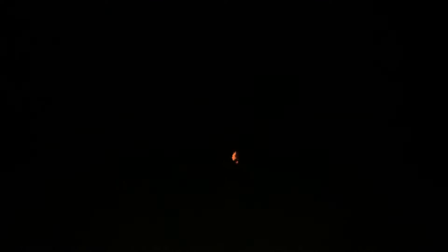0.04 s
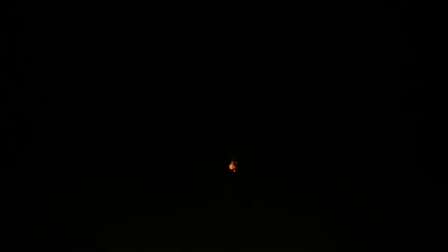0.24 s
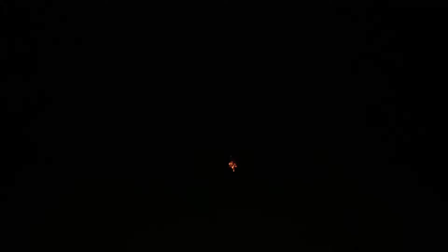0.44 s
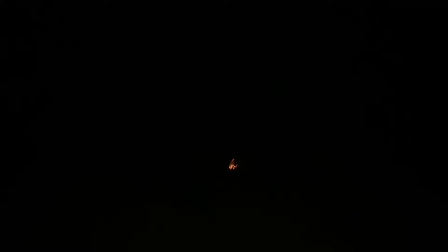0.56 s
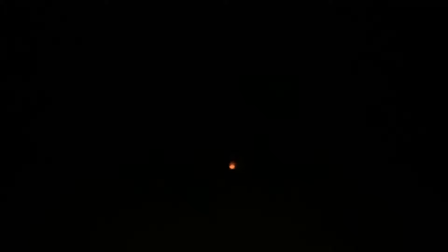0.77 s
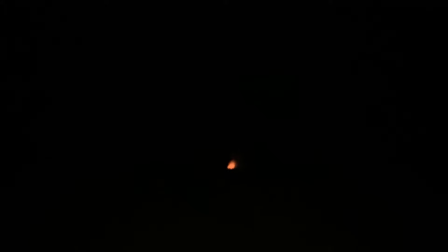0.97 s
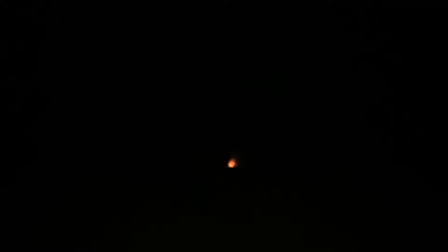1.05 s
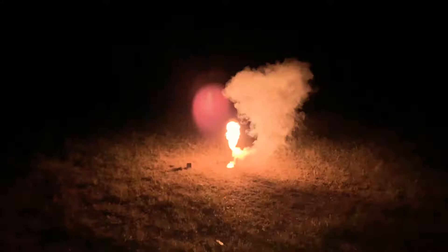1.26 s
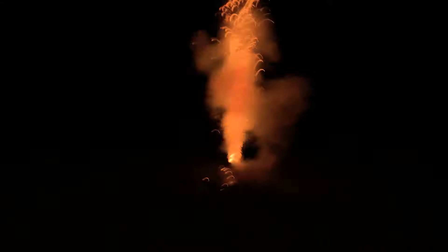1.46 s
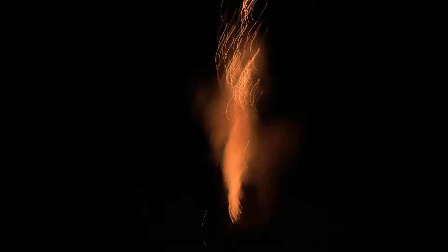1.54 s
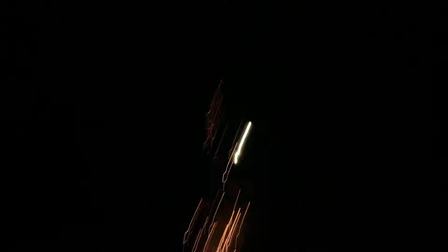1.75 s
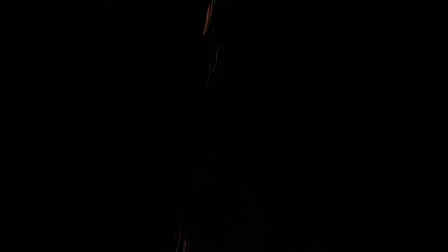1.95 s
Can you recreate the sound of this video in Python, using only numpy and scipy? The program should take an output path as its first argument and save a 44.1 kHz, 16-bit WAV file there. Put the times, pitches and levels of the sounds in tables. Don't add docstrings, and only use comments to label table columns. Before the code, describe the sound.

A firework lift charge fires with one loud sharp bang after a faint fuse hiss at night

```python
import sys
import numpy as np
from scipy import signal
from scipy.fft import rfft, irfft, next_fast_len
from scipy.io import wavfile
from scipy.ndimage import map_coordinates

SR = 44100
rng = np.random.default_rng(int(sys.argv[2]) if len(sys.argv) > 2 else 0)


def pcm_store(signal):
    levels = np.round(np.clip(np.atleast_2d(signal), -1, 1) * 32767)
    wavfile.write(sys.argv[1], SR, levels.astype(np.int16).T)


def ratio(d):
    e = np.asarray(d, float) / 20
    return 10 ** e


N = 88508
BANG_S = 1.398


def unit(x):
    return x / np.sqrt(np.mean(x ** 2) + 1e-20)


def along(points, hz):
    f, db = np.transpose(points)
    return np.interp(np.log(hz + 1), np.log(f + 1), db, left=-120, right=-120)


def levels(rows):
    s, *columns = np.transpose(rows)
    t = np.arange(N) / SR
    return [ratio(np.interp(t, s, db, left=-200, right=-200)) for db in columns]


def wobble(rate):
    knots = rng.standard_normal(int(N * rate / SR) + 4)
    return map_coordinates(knots, [np.arange(N) * rate / SR])


def coloured(x, colour_db):
    m = next_fast_len(N + 8192)
    gain = ratio(colour_db(np.fft.rfftfreq(m, 1 / SR)))
    return unit(irfft(rfft(x, m) * gain, m)[:N])


def noise(points, rough_db=0):
    grains = rng.standard_normal(N) * ratio(rough_db * wobble(900))
    return coloured(grains, lambda hz: along(points, hz))


def band(hz, width_hz):
    def resonance_db(f):
        return -30 * np.log10(1 + (2 * (f - hz) / width_hz) ** 2)
    return coloured(rng.standard_normal(N), resonance_db)


def burst(s, db, hz, half_s):
    t = np.arange(N) / SR - s
    return -ratio(db) * np.exp(-(t / half_s) ** 2) * np.cos(2 * np.pi * hz * t)


# frequency in Hz, density in dB per Hz.
NIGHT_COLOUR = [(140, -31), (1200, -12.5), (2300, -8), (3250, -19.5), (3750, -10), (6200, -10), (7700, -33),
                (9200, -16), (11200, -18), (15800, -22)]
# frequency in Hz, density in dB per Hz.
RUMBLE_COLOUR = [(15, -41), (25, -24), (81, -4), (120, -10), (146, -14), (200, -15.5), (260, -16),
                 (440, -120)]


def night_air():
    return ratio(-53.5) * noise(NIGHT_COLOUR) + ratio(-73.5) * noise(RUMBLE_COLOUR)


# middle in seconds, peak in dB, pitch in Hz.
ENGINE_THUDS = [(.005, -53.5, 85), (0.071, -54.5, 75), (.135, -62, 60), (0.213, -59, 74), (0.264, -58, 80),
                (.36, -59, 60), (.468, -61, 90), (.515, -65, 69), (0.601, -61.5, 85), (.68, -58, 85),
                (.795, -61, 70), (0.879, -61, 85), (1.016, -67, 90), (1.071, -58, 83.4), (1.105, -61, 85),
                (1.22, -61, 70), (1.33, -62, 65)]
# middle in seconds, level in dB, pitch in Hz.
KNOCKS = [(.01, -60.5, 305), (.11, -67, 392), (0.555, -68.5, 284), (.81, -57, 1000), (.86, -70, 345),
          (1.33, -60.5, 607)]


def far_engine():
    trim_db, thud_cycles, knock_s = -1.5, 0.61, 0.0058
    thuds = sum(burst(s, db + trim_db, hz, thud_cycles / hz) for s, db, hz in ENGINE_THUDS)
    knocks = sum(burst(s, db, hz, knock_s) for s, db, hz in KNOCKS)
    return thuds + knocks


# pitch in Hz, width in Hz, level in dB, trill in Hz, trill depth from 0 to 1.
CHORUSES = [
    (2041, 310, -56.5, 0, 0),
    (5790, 370, -63.5, 40, 0),
    (4140, 2200, -78, 0, 0),
    (6860, 220, -70, 19.5, 1),
]
# middle in seconds, half length in seconds, level in dB.
NEAR_CALLS = [
    (0.842, 0.057, -59.5),
    (1.072, 0.061, -60.5),
    (1.336, 0.05, -66.5),
]


def crickets():
    t = np.arange(N) / SR
    chorus = np.zeros(N)
    for hz, width_hz, db, trill_hz, depth in CHORUSES:
        trill = 1 + np.clip(depth, 0, 1) * np.cos(2 * np.pi * trill_hz * (t - 1.147))
        waver_db = 1.85 * wobble(29.8) + 0.99 * wobble(4.7)
        chorus += ratio(db + waver_db) * trill * band(hz, width_hz)
    calls = sum(ratio(db) * np.exp(-((t - s) / half_s) ** 4) for s, half_s, db in NEAR_CALLS)
    return chorus + calls * band(3150, 800)


# frequency in Hz, density in dB per Hz.
BUZZ_COLOUR = [(7900, -30), (8800, -8), (10000, -5), (11100, -20), (12300, 0), (14500, -1), (15700, -8)]


def buzzing_katydid():
    stroke_hz, start_s, decay_s, weak_db = 87.1, .0018, 0.0042, -1.1
    stroke = (np.arange(N) / SR - start_s) * stroke_hz
    decay = np.exp(-(stroke % 1) / stroke_hz / decay_s)
    strokes = decay * ratio(weak_db * (np.floor(stroke) % 2) + 0.55 * wobble(5.5))
    return ratio(-58) * unit(strokes) * noise(BUZZ_COLOUR, rough_db=0.2)


# middle in seconds, level in dB.
CHIRPS = [(.083, -7), (.22, 4), (.358, 5), (.508, 2), (.652, 2.5), (.792, 2), (.928, 3.5), (1.075, 2),
          (1.212, 3), (1.36, -5), (1.93, 7)]
# frequency in Hz, density in dB per Hz.
CHIRP_COLOUR = [(9000, -25), (10300, -9), (11300, -8), (13200, -3), (14700, 0), (15700, -5)]


def chirping_katydid():
    t = np.arange(N) / SR
    half_s = .021
    chirps = sum(ratio(db) * np.exp(-((t - s) / half_s) ** 4) for s, db in CHIRPS)
    return ratio(-57.5) * chirps * noise(CHIRP_COLOUR, rough_db=3.0)


# time in seconds, level in dB.
FUSE = [
    (0, -51),
    (.13, -49.5),
    (.6, -55),
    (1.05, -64),
    (1.27, -70),
    (1.36, -68),
]
# frequency in Hz, density in dB per Hz.
FUSE_COLOUR = [(1530, -38), (2600, -1), (3240, -39), (3650, -7), (5170, -5), (6830, 4.5), (8570, -5),
               (14400, -2), (15800, -12)]
# time in seconds, level in dB.
FLARE = [
    (1.27, -75),
    (1.293, -60),
    (1.302, -51.5),
    (1.335, -51),
    (1.35, -51),
    (1.375, -45),
    (1.398, -44),
]
# frequency in Hz, density in dB per Hz.
FLARE_COLOUR = [(300, -17), (700, -8), (1500, -2), (3200, -8), (5500, -7), (8300, -9), (10500, -2),
                (15800, -16)]


def fuse():
    last_db = FUSE[-1][1]
    level, = levels(FUSE + [(BANG_S, last_db)])
    flare, = levels(FLARE)
    hiss = level * ratio(0.67 * wobble(23.9)) * noise(FUSE_COLOUR, rough_db=1.0)
    return hiss + flare * noise(FLARE_COLOUR, rough_db=-1.5)


# time in seconds, hiss in dB, boom in dB, brightness in dB per octave.
NEAR = [(1.439, -37, -36, -8), (1.45, -33.5, -36, -1.5), (1.462, -32, -38, 5.5), (1.486, -28.5, -36, 1),
        (1.505, -39.5, -27, 3.5), (1.522, -30, -41, 1), (1.535, -41, -33, 5.5), (1.552, -42, -37, 8)]
# time in seconds, hiss in dB, boom in dB, brightness in dB per octave.
FAR = [(1.551, -42.5, -36, 11), (1.574, -36, -39, 4), (1.62, -31.5, -37, 7), (1.66, -33, -35.5, 4),
       (1.71, -35.5, -42.5, 3.5), (1.79, -34.5, -37, 2), (1.871, -41, -42, 3.5), (1.904, -46, -47, 3.5),
       (2.007, -46, -53, 3.5)]
# frequency in Hz, density in dB per Hz.
ECHO_COLOUR = [(180, -23), (300, 0), (990, -0.5), (1380, -4.5), (1600, -0.5), (1740, -8.5), (2470, -6.5),
               (4710, -8), (15800, -14)]
# frequency in Hz, density in dB per Hz.
BOOM_COLOUR = [(15, -37), (25, -23), (54, -2.5), (188, -0.5), (268, -8.5), (450, -9.5), (580, -11),
               (990, -120)]


def scattered_echoes():
    rows = np.array(NEAR + FAR)
    hz, s, z = signal.stft(noise(ECHO_COLOUR), SR, nperseg=256)
    brightness = np.interp(s, rows[:, 0], rows[:, 3])
    tilt_db = np.outer(np.log2(np.clip(hz, 500, 6000) / 2000), brightness)
    travel_s = np.clip(s - BANG_S, 0, 1)
    air_db = 54.5 * np.outer((hz / 8700.0) ** 1.2, travel_s)
    shaped = z * ratio(tilt_db - np.minimum(air_db, 30))
    shaped = shaped * np.linalg.norm(z, axis=0) / np.linalg.norm(shaped, axis=0)
    hiss = signal.istft(shaped, SR, nperseg=256)[1][:N]
    near, far = rows[:len(NEAR), :3], rows[len(NEAR):, :3]
    hiss_level, boom_level = np.add(levels(near), levels(far))
    boom = ratio(-5) * boom_level * noise(BOOM_COLOUR)
    return hiss_level * ratio(1.44 * wobble(70)) * hiss + boom


# middle in seconds, level in dB, pitch in Hz.
SLAPS = [(1.466, -28, 900), (1.486, -26, 910), (1.522, -33, 980), (1.563, -36, 2100), (1.584, -26, 860),
         (1.624, -29, 1540), (1.626, -28, 1000), (1.641, -20.5, 920), (1.642, -33.5, 1600),
         (1.654, -28, 1570), (1.656, -31.5, 810), (1.667, -27, 1070), (1.676, -23.5, 990),
         (1.688, -36, 1240), (1.707, -35, 1050), (1.721, -31.5, 915), (1.74, -33, 1150), (1.75, -34, 2000),
         (1.76, -31, 2030), (1.785, -33.5, 2040), (1.824, -33, 895), (1.847, -31, 1060)]
# frequency in Hz, density in dB per Hz.
SLAP_COLOUR = [(250, -8), (900, 0), (1800, -5), (4000, -18), (9000, -40)]


def wall_slaps():
    t = np.arange(N) / SR
    half_s = .002
    crack = ratio(-9) * noise(SLAP_COLOUR)
    slaps = np.zeros(N)
    for s, db, hz in SLAPS:
        bell = np.exp(-((t - s) / half_s / 1.88) ** 2)
        slaps += burst(s, db, hz, half_s) + ratio(db) * bell * crack
    return slaps


# middle in seconds, level in dB, pitch in Hz, half length in cycles.
PUSHES = [(1.409, -12, 207, 0.77), (1.426, -20.5, 205, 1.3), (1.44, -22, 150, 0.6),
          (1.455, -22.5, 60, 0.41), (1.5057, -24.5, 99, 0.55), (1.521, -28, 84, 0.56),
          (1.526, -24.5, 201, 0.36), (1.5318, -23, 177, 0.72), (1.59, -29.5, 200, 0.91),
          (1.606, -37.5, 170, 1.5), (1.643, -32.5, 253, 0.93), (1.662, -34.5, 149, 1.7),
          (1.739, -38.5, 85, 1.8), (1.793, -33, 197, 1.3), (1.875, -40, 101, 1.2)]


def low_pushes():
    return sum(burst(s, db, hz, cycles / hz) for s, db, hz, cycles in PUSHES)


# middle in seconds, level in dB, pitch in Hz.
SPARK = (1.953, -59, 11000)


def spark():
    return burst(*SPARK, .0006)


# peak in seconds, level in dB.
CRACKS = [
    (1.398, -6),
    (1.403, -17),
]
# frequency in Hz, density in dB per Hz.
CRACK_COLOUR = [(800, -20), (2000, -5), (6500, 0), (10000, -9), (15500, -14)]


def crack():
    t = np.arange(N) / SR
    t60_s = .006
    level = np.zeros(N)
    for s, db in CRACKS:
        side = np.where(t > s, 1, .4)
        level += ratio(db - 60 * np.abs(t - s) / t60_s) * side
    return level * noise(CRACK_COLOUR)


# time in seconds, level in dB.
JET = [
    (1.399, -28),
    (1.41, -30),
    (1.4145, -24),
    (1.4185, -13),
    (1.4205, -11.5),
    (1.4255, -12),
    (1.4305, -11.5),
    (1.4345, -24),
    (1.446, -47.5),
]
# frequency in Hz, density in dB per Hz.
JET_COLOUR = [(180, -50), (400, 3), (750, 0), (1800, 8), (2600, -3), (3670, 3), (5200, -3.5), (6890, -1.5),
              (13400, -9.5), (15800, -11)]


def flame_jet():
    t = np.arange(N) / SR
    lead = ratio(-19 - 60 * np.abs(t - BANG_S) / .04) * (t < JET[0][0])
    jet, = levels(JET)
    return (lead + jet) * noise(JET_COLOUR, rough_db=3.0)


# start in seconds, level in dB, share of ring length, share of pitch.
THUMPS = [
    (1.3988, -1, .92, 1),
    (1.4168, -9, .5, 1),
    (1.4296, -8, .5, 1.9),
]


def tube_ring():
    tube_hz, start_hz, settle_s, ring_s = 268, 770, .0012, .0066
    rings = np.zeros(N)
    for s, db, length, pitch in THUMPS:
        t = np.clip(np.arange(N) / SR - s, 0, 1)
        hz = pitch * tube_hz
        turns = hz * t + (start_hz - hz) * settle_s * (1 - np.exp(-t / settle_s))
        decay = np.exp(-(t / (length * ring_s)) ** 1.46)
        rings -= ratio(db) * decay * np.sin(2 * np.pi * turns)
    return rings


def scene():
    since = np.arange(N) / SR - BANG_S
    duck_db, recover_db_per_s = -24, 19
    recovery_db = np.minimum(duck_db + recover_db_per_s * since, 0)
    gain = ratio(np.where(since > 0, recovery_db, 0))
    insects = crickets() + buzzing_katydid() + chirping_katydid()
    quiet = night_air() + far_engine() + insects + fuse()
    echoes = scattered_echoes() + wall_slaps() + low_pushes() + spark()
    bang = crack() + flame_jet() + tube_ring()
    return (gain * quiet + echoes + bang)[None]


def roll_off(x):
    return signal.sosfilt(signal.butter(12, 16120, fs=SR, output="sos"), x)


def record(dry):
    top, knee, top_hz = .8, 3.5, 15850
    clipped = dry / (1 + np.abs(dry / top) ** knee) ** (1 / knee)
    passed = np.fft.rfftfreq(2 * N, 1 / SR) < top_hz
    limited = irfft(rfft(clipped, 2 * N) * passed, 2 * N)[:, :N]
    return roll_off(limited)


dry = scene()
out = record(dry)
pcm_store(out)
```